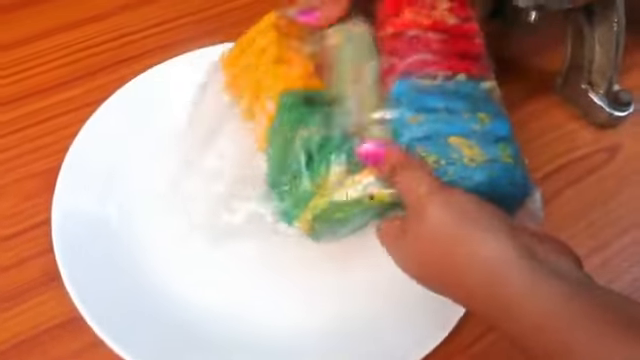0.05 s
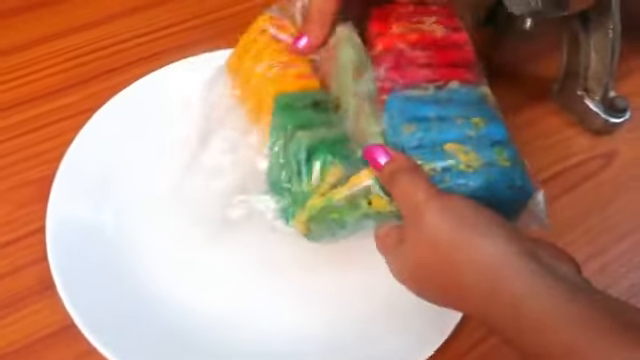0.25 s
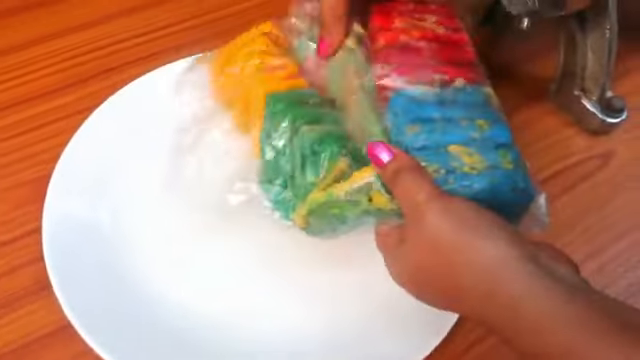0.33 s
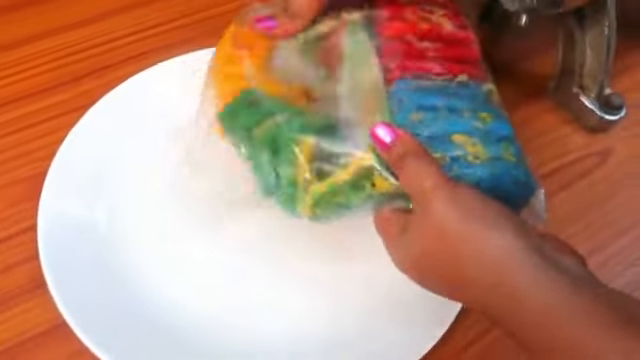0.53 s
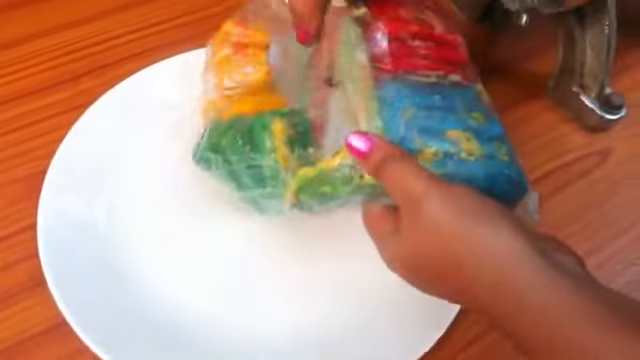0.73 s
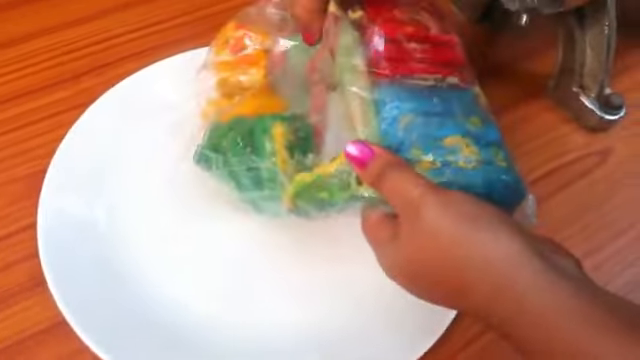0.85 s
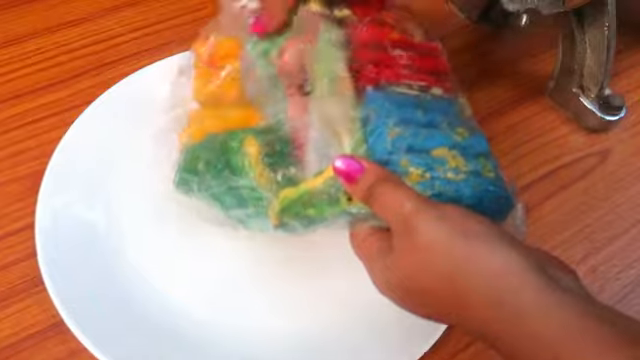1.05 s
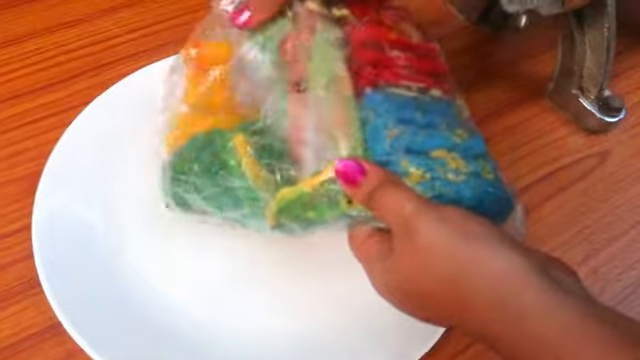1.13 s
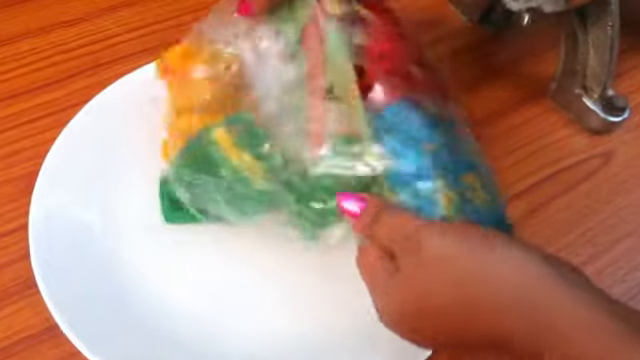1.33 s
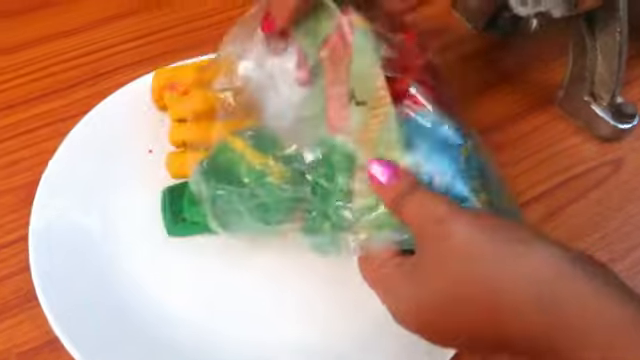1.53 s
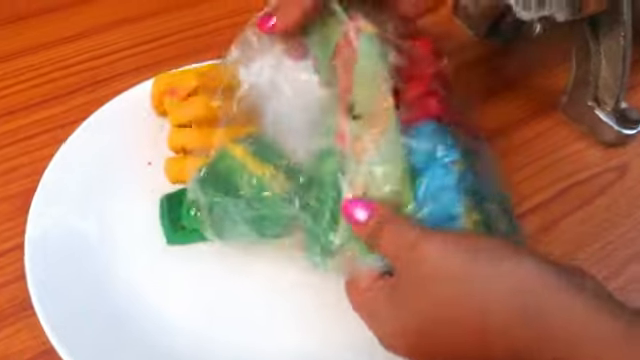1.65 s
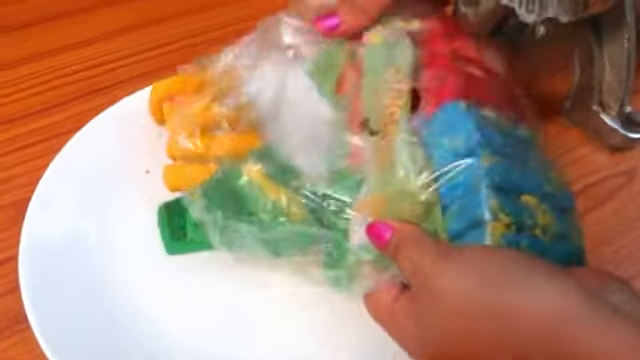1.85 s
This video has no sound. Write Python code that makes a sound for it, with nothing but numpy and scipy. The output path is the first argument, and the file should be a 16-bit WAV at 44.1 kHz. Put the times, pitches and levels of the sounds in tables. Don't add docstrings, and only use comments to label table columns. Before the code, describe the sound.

Thin plastic bag crackles from the start, close and bright, with sliding film and a dull drag underneath. Snaps grow loudest around 0.37-0.7 s. A faint low thump comes near 0.6 s, then a hard ceramic clack with a beating thump at 0.8 s. Rustling thins to faint crinkles around 0.9-1.25 s, snaps again near 1.4 s, more packets knock at 1.52-1.61 s, then light crackle continues to the end. Short room tail, faint hiss.

```python
import sys
import numpy as np
from scipy import signal
from scipy.fft import rfft, irfft, next_fast_len
from scipy.io import wavfile
from scipy.ndimage import map_coordinates

SR = 44100
rng = np.random.default_rng(int(sys.argv[2]) if len(sys.argv) > 2 else 0)


def ratio_of_db(decibels):
    return 10 ** (np.asarray(decibels, float) / 20)


def materialize(psi):
    bounded = np.clip(np.atleast_2d(psi).T, -1, 1)
    quanta = np.round(bounded * 32767).astype(np.int16)
    wavfile.write(sys.argv[1], SR, quanta)


N = 83790

# [f/Hz, density/dB per Hz]
FIZZ = [(2500, -11.5), (5000, 5), (8000, -10.5), (12000, 1), (14500, 3), (15900, -20)]


def unit(x):
    return x / np.sqrt(np.mean(x ** 2) + 1e-20)


def along(points, hz):
    f, v = np.transpose(points)
    return np.interp(np.log(hz + 1), np.log(f + 1), v)


def wobble(rate):
    return map_coordinates(rng.standard_normal(800), [np.arange(N) * np.clip(rate, 1, 400) / SR])


def coloured(x, spectrum):
    m = 2 * next_fast_len(N // 2 + 4096)
    level_db = np.maximum(along(spectrum, np.fft.rfftfreq(m, 1 / SR)), -80)
    cepstrum = irfft(np.log(ratio_of_db(level_db)), m)
    cepstrum[1:m // 2] *= 2
    cepstrum[m // 2 + 1:] = 0
    return irfft(rfft(x, m) * np.exp(rfft(cepstrum)), m)[:N]


def scatter(s, shapes):
    at = np.round(s * SR).astype(int)[:, None] + np.arange(shapes.shape[1])
    return np.bincount(at.ravel(), shapes.ravel(), N + SR)[:N]


def pings(s, db, hz, cycles, size):
    turn = np.arange(size) / SR * np.clip(hz, 200, 9000)[:, None]
    rise = (1 - np.exp(-2 * turn)) ** 2
    tone = np.sin(2 * np.pi * turn) * np.exp(-turn / cycles)
    return scatter(s, ratio_of_db(db)[:, None] * tone * rise)


def ticks(s, db, life_s):
    t = np.arange(256) / SR
    noise = rng.standard_normal((len(s), len(t)))
    shape = np.exp(-t / life_s) * (1 - np.exp(-2 * t / life_s))
    return scatter(s, ratio_of_db(db)[:, None] * noise * shape)


def crowd(per_s, size_db, count):
    u = rng.random((count, 3))
    db = np.minimum(-size_db * np.log(1 - u[:, 1]), 12)
    unused = u[:, 2] * count * SR / N > per_s
    return u[:, 0] * N / SR, db - 200 * unused


def small_creases():
    at, db = crowd(per_s=2000, size_db=2, count=5000)
    colour = rng.standard_normal((len(at), 2))
    hz = 2750 * 2 ** np.minimum(0.61 * colour[:, 0], 1)
    ping_db = db + 2.5 * np.minimum(colour[:, 0], 0)
    creases = unit(pings(at, ping_db, hz, cycles=1.78, size=256))
    crisp = unit(coloured(ticks(at, db + 3 * colour[:, 1], life_s=0.00032), FIZZ))
    return creases, ratio_of_db(-20) * crisp


def sliding_film():
    # [f/Hz, density/dB per Hz]
    film = [(290, -52), (500, 2), (1500, 0.5), (2060, -26), (3130, 11.5), (7500, -23), (9750, -117),
            (16500, -120)]
    return ratio_of_db(-6 + 3.4 * wobble(44.28)) * unit(coloured(rng.standard_normal(N), film))


def film_fizz():
    at, db = crowd(per_s=1800, size_db=5, count=8000)
    fine = ratio_of_db(-17.5) * unit(coloured(ticks(at, db, life_s=0.0003), FIZZ))
    return fine + ratio_of_db(-19.5) * unit(coloured(rng.standard_normal(N), FIZZ))


def dragging_load(weight_db):
    # [f/Hz, density/dB per Hz]
    dull = [(35, -50), (60, -31.5), (318, -11), (396, -10), (543, -8), (1100, -5.5), (1430, -39.5),
            (2420, -120)]
    return ratio_of_db(-15.5 + weight_db + 3.2 * wobble(29.89)) * unit(coloured(rng.standard_normal(N), dull))


def bag():
    # [t/s, effort/dB, crispness/dB, weight on the plate/dB]
    hands = [(0, -36.5, 6, -13), (0.081, -42, 11, 10), (0.128, -50.5, 12.5, 3), (0.201, -35.5, 4.5, 1),
             (0.292, -35, 1, 4), (0.332, -50.5, -4, 6), (.365, -44.5, -2, 4),
             (.41, -38.5, 1, 11), (0.499, -33.5, 10, 7.5), (.59, -41, 8, 7), (0.66, -26, 3.5, 6),
            (0.742, -37.5, 6, 4.5), (.86, -42.5, 3, 16.5), (0.929, -49, 0, 11), (1.031, -50, 7, -13),
            (1.09, -61.5, 10, 10.5),
             (1.16, -51.5, 10, 6.5), (1.22, -52, 5, 6.5), (1.27, -46, 6.5, 11.5), (1.36, -49.5, 5, -16),
           (1.459, -38.5, 12.5, -13), (1.56, -40, 8, 9.5), (1.65, -48.5, -8, 14.5), (1.835, -55, 7.5, 11.5),
           (1.862, -43.5, 8, 5.5)]
    s, *curves = np.transpose(hands)
    effort_db, crisp_db, weight_db = [np.interp(np.arange(N) / SR, s, c) for c in curves]
    clumps = ratio_of_db(effort_db + 3 * wobble(220) + 0.94 * wobble(260))
    creases, crisp = small_creases()
    slide = sliding_film()
    fizz = ratio_of_db(crisp_db + 2.0 * wobble(90)) * (crisp + film_fizz())
    return clumps * (creases + slide + fizz) + ratio_of_db(effort_db) * dragging_load(weight_db)


def snaps():
    # [t/s, peak level/dB, f/Hz, crispness/dB]
    early = [(0.008, -28, 2660, 10), (0.0376, -26.5, 1210.0, 17), (0.0634, -17.5, 3400, -1),
             (0.0706, -18.5, 3620, 1), (0.0796, -22.5, 2500, -1), (0.103, -24.5, 2680, 3),
             (0.1187, -25, 3270, -3), (0.135, -23.5, 3470.0, 0), (0.1524, -22.5, 3600, 3),
             (0.1588, -17.5, 3900, 4), (0.1745, -23.5, 3320, -4), (0.1906, -19, 3600, 1),
             (0.2, -17, 1670, -1), (0.2067, -19, 1200, -2), (0.216, -18, 1900, -1), (0.225, -25, 3130, 0),
             (0.236, -19, 3370, -6), (0.2467, -22.5, 1250, -4), (0.265, -20.5, 1530, -4),
             (0.2955, -24, 2480, -12), (0.3081, -21.5, 3130, -5.5), (0.323, -22, 2570, -21),
             (0.3338, -31, 2700, -9), (0.3473, -24.5, 2230, -10), (0.3752, -12.5, 3200, -15),
             (0.3804, -30, 1850, -11), (0.3905, -14.5, 3280, -5), (0.4033, -14.5, 2410, -10),
             (0.4072, -14, 3300, -16), (0.4129, -18, 3000, -5), (0.451, -21, 2440, 1),
             (0.476, -17.5, 3230.0, -7), (0.4948, -15.5, 2570, 0), (0.501, -9.5, 3430, -5),
             (0.5226, -17, 3380, -11), (0.55, -14.5, 3070, 4.5), (0.5548, -19, 3170, -11),
             (0.5802, -17, 1680.0, 0), (0.6132, -24, 2250, -11), (0.625, -19, 1960.0, 1),
             (0.6436, -18.5, 2660, 8.5), (0.6558, -9, 3270, -9), (0.6643, -13, 3120, 3)]
    late = [(0.6787, -17, 3200, -15), (0.683, -14, 3190.0, 1), (0.7195, -20, 2500, -8.5),
            (0.8802, -22, 2550, -19), (0.8861, -24.5, 2420, -10), (0.9073, -29, 2560.0, -13),
            (0.9306, -33, 2370, -10), (0.9417, -28, 4200, -14), (0.966, -34, 3580, 6),
            (0.978, -35.5, 2400, 0), (0.9847, -35, 1334, 3.5), (1.03, -31, 3870, -1),
            (1.035, -22.5, 3880, 2), (1.07, -33.5, 3400, 5), (1.1147, -35, 3100.0, 11.5),
            (1.1561, -30.5, 3120.0, 5), (1.1604, -30, 3120, 0), (1.1752, -29, 3970, 1),
            (1.2194, -43, 1310.0, -3), (1.2572, -29.5, 3900, 6.5), (1.272, -20, 5700, -7),
            (1.3084, -30.5, 2870, -12), (1.327, -29.5, 2330.0, -2), (1.3368, -28, 2320, 5.5),
            (1.3841, -16.5, 2500, -12), (1.3945, -23.5, 2380, 2), (1.4078, -21, 2580, 2.5),
            (1.413, -23, 2310, -11), (1.4701, -26, 2330.0, 11), (1.4863, -21.5, 2170.0, -33),
            (1.5283, -17, 3820, -4), (1.6464, -27, 3790.0, -6), (1.6782, -26.5, 2200, -13),
            (1.7107, -27, 3130, -25), (1.7195, -30.5, 2050, -16), (1.7549, -34.5, 2860.0, -5),
            (1.7913, -30.5, 3230, -3), (1.837, -33.5, 2630, -9), (1.8549, -21.5, 2720, 1),
            (1.8682, -22, 3230, 6), (1.8737, -23.5, 3400, -3), (1.878, -25, 2980, 2),
            (1.898, -23, 3320, -10)]
    further = [(0.792, -18, 2400, -4), (0.826, -19.5, 2900, -8.5), (1.1343, -38, 3300, 15),
               (1.4664, -30.5, 2210, 16.5), (1.552, -20, 3900, 4), (1.578, -24, 5000, -22),
               (1.5865, -21, 2250, -24)]
    s, db, hz, crisp_db = np.transpose(early + late + further)
    stray = rng.standard_normal((len(s), 4))
    out = pings(s, db + 3, hz, cycles=2.4, size=512)
    for k, body_hz in enumerate((1412, 3150)):
        body_s = s + 0.001068 * abs(stray[:, k])
        out = out + pings(body_s, db - 2, body_hz * 2 ** (0.15 * stray[:, k + 2]), cycles=1.1, size=512)
    click = np.zeros(N)
    click[0] = 1
    crisp = coloured(ticks(s, db + crisp_db - 7, life_s=0.0009), FIZZ)
    return out + crisp / np.linalg.norm(coloured(click, FIZZ))


def plate_rocking():
    low_hz, high_hz, rock_t60 = 290, 344, 0.072
    push_hz, push_db, push_t60 = 165.4, -22.5, 0.23
    # [t/s, level/dB, signed share of the lower tone]
    thumps = [(0.588, -26.5, 0.55), (0.789, -24.5, 0.28), (0.798, -19.5, -0.57), (0.8063, -21, 1),
              (1.352, -38.5, 0.71), (1.367, -35.5, 0.85), (1.524, -32, -0.18), (1.544, -27, 0.17),
              (1.573, -29.5, 0.95), (1.591, -16, 0.21), (1.606, -25, 0.65), (1.648, -30, 0.43)]
    t = np.arange(SR // 4) / SR
    rise = 1 - np.exp(-t / 0.0032)
    push = ratio_of_db(push_db - 60 * t / push_t60) * np.sin(2 * np.pi * push_hz * t)
    fade = ratio_of_db(-60 * t / rock_t60)
    low = np.sin(2 * np.pi * low_hz * t)
    high = np.sin(2 * np.pi * high_hz * t)
    rocks = [ratio_of_db(db) * rise * (push + fade * (high + share * low)) for _, db, share in thumps]
    return scatter(np.array([row[0] for row in thumps]), np.array(rocks))


def packet_knocks():
    # [t/s, level/dB, favoured f/Hz, spread/octaves, crack level/dB]
    knocks = [(.7465, -28, 600, .3, -30), (.7815, -24, 1300, .4, -9), (.837, -22, 1900, .7, -9),
              (1.522, -28, 1100, .4, -20), (1.559, -22, 1050, .3, -20), (1.571, -26, 2900, .4, -9),
              (1.609, -26, 2900, .4, -9), (.8005, -22, 580, .4, -30), (1.5886, -17, 1200, .3, -30),
              (1.5935, -21, 2100, .3, -9), (1.59, -25, 560, .3, -30), (.7995, -4.5, 1360, .7, -19),
              (1.5388, -13.5, 1150, .6, -30), (1.5406, -17, 1850, .6, -30), (1.5884, -11, 2800, .55, -35)]
    # [f/Hz, level/dB, time to fade by 60 dB/s]
    tones = [(560, -13, .02), (725, -14, .03), (1050, -12, .018), (1165, -8, .02), (1550, -10, .026),
             (1841, -12, .03), (2008, -8, .028), (2290, -6, .036), (2540, -8, .022), (3040, -4, .027),
             (3460, -7, .022), (4100, -14, .015)]
    t = np.arange(SR // 4) / SR
    hz, level_db, t60 = np.transpose(tones)[..., None]
    rebounds = [(s + 0.0027, db - 3, near_hz * 1.15, octaves) for s, db, near_hz, octaves, _ in knocks]
    blows = [row[:4] for row in knocks] + rebounds
    rise = 1 - np.exp(-t / 0.0002)
    rings = []
    for _, db, near_hz, octaves in blows:
        off_pitch_db = 4.1 * (np.log2(hz / near_hz) / octaves) ** 2
        fading = ratio_of_db(level_db - off_pitch_db - 60 * t / t60)
        rings.append(ratio_of_db(db) * np.sum(fading * np.sin(2 * np.pi * hz * t), 0) * rise)
    s, db, _, _, crack_db = np.transpose(knocks)
    crack_colour = [(200, 6), (1200, 20.5), (3500, 28.0), (6000, 5), (12000, -65)]
    crack = coloured(ticks(s, db + crack_db, life_s=0.0004), crack_colour)
    s, db, near_hz, _ = np.transpose(blows)
    thud = pings(s, db + 7.5, near_hz, cycles=1.7, size=256)
    return crack + thud + scatter(s, np.array(rings))


def room(x):
    # [f/Hz, time to fade by 60 dB/s]
    fade = [(200, 0.16), (2000, 0.14), (10000, 0.021)]
    hz, t, z = signal.stft(rng.standard_normal(SR // 3), SR, nperseg=256)
    tail = signal.istft(z * ratio_of_db(-60 * t / along(fade, hz)[:, None]), SR, nperseg=256)[1]
    late = np.pad(x, (90, 0))
    return signal.fftconvolve(late, tail / np.linalg.norm(tail))[:N]


def scene():
    plastic = bag() + snaps()
    plate = plate_rocking() + packet_knocks()
    echo = room(ratio_of_db(-14) * plastic + ratio_of_db(-19) * plate)
    return (plastic + plate + echo)[None]


def roll_off(x):
    return signal.sosfilt(signal.butter(12, 15900, fs=SR, output="sos"), x)


def record(dry):
    # [f/Hz, density/dB per Hz]
    hiss = [(20, -17), (70, 0), (200, 0), (1000, -5), (3200, -7), (6000, -33), (13000, -19), (15900, -64)]
    # [f/Hz, gain/dB]
    mic = [(40, -19), (170, 0), (7700, 0), (8330, -9), (8900, -1.5), (10000, 0.5), (15750, -8.5),
           (16050, -26)]
    still = ratio_of_db(-66) * unit(coloured(rng.standard_normal(N), hiss))
    mix = np.clip(coloured(dry[0], mic) + still, -1, 1)
    return roll_off(mix[None])


dry = scene()
out = record(dry)
materialize(out)
```